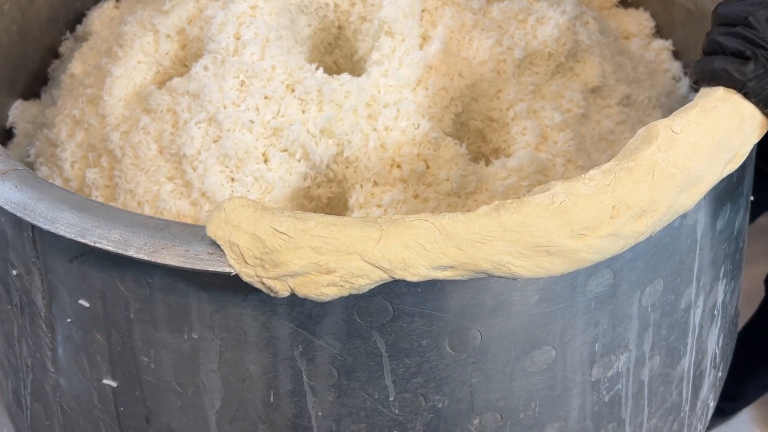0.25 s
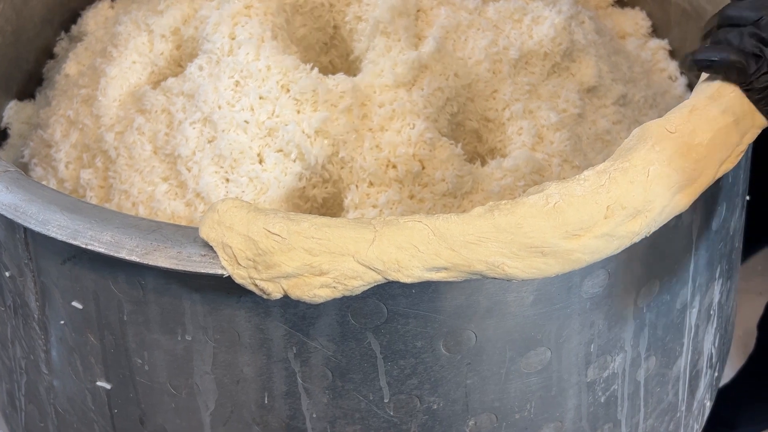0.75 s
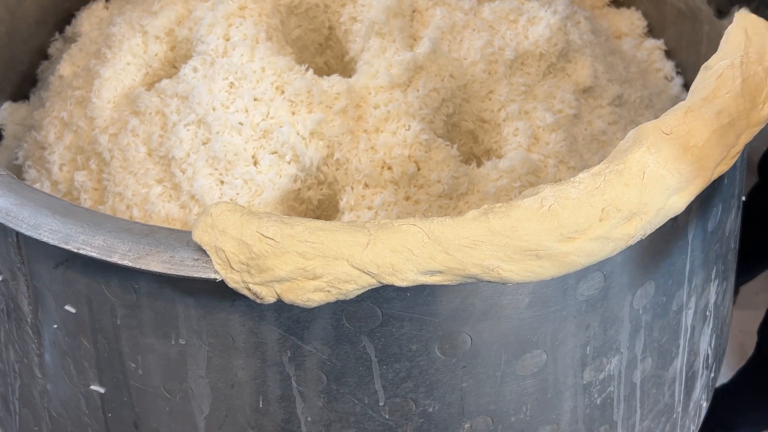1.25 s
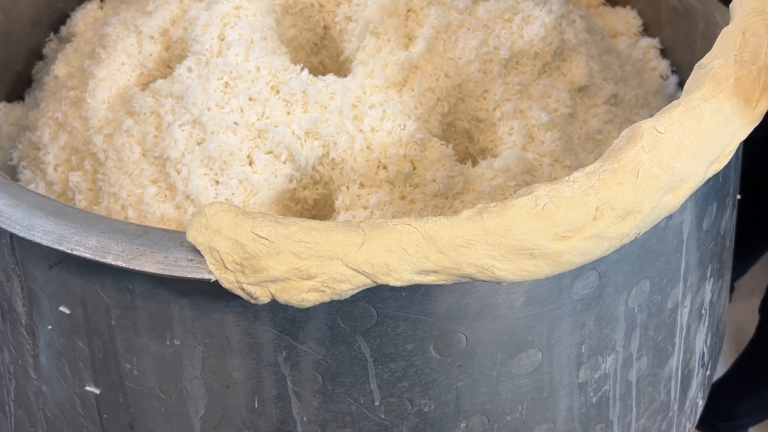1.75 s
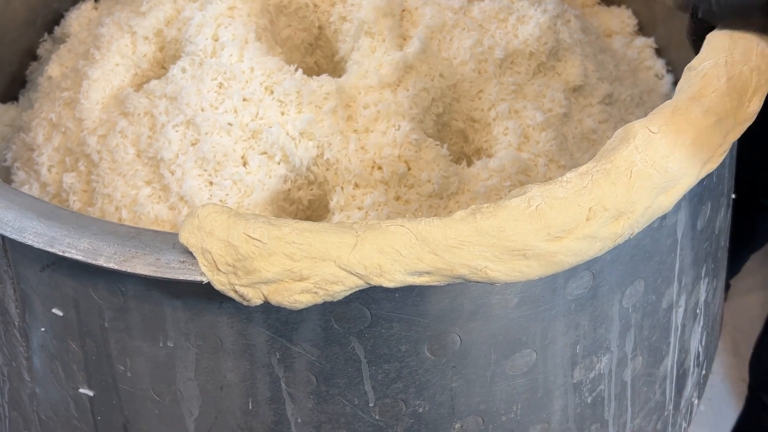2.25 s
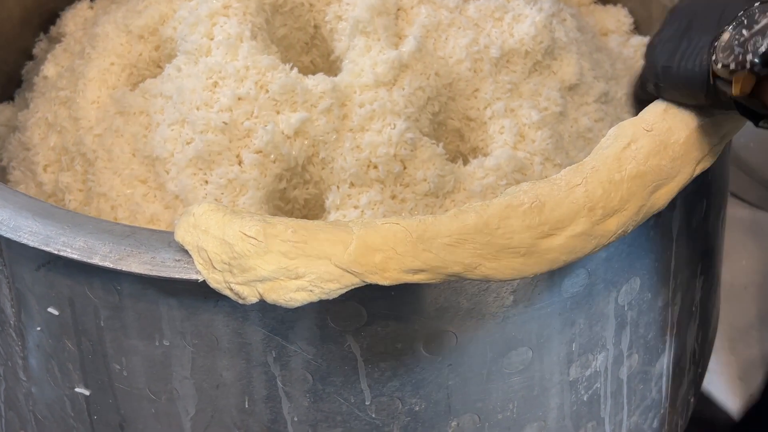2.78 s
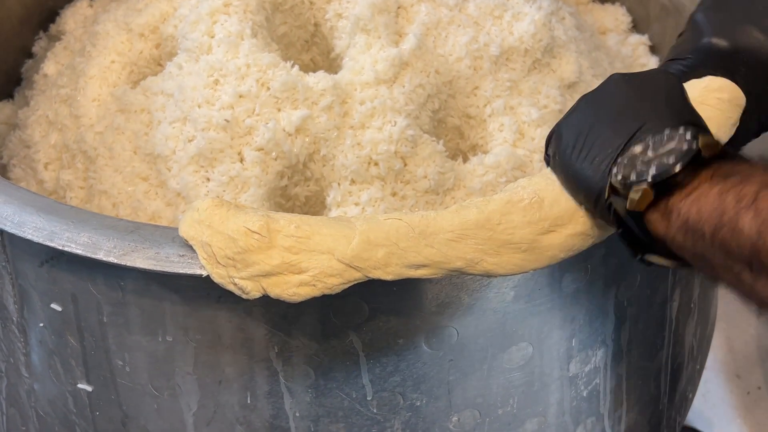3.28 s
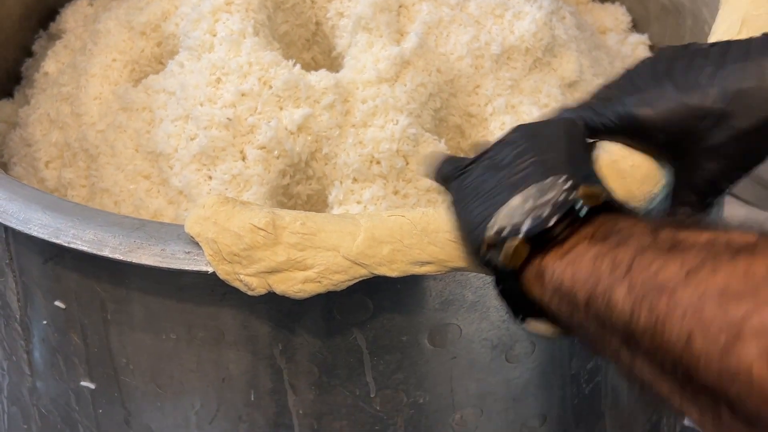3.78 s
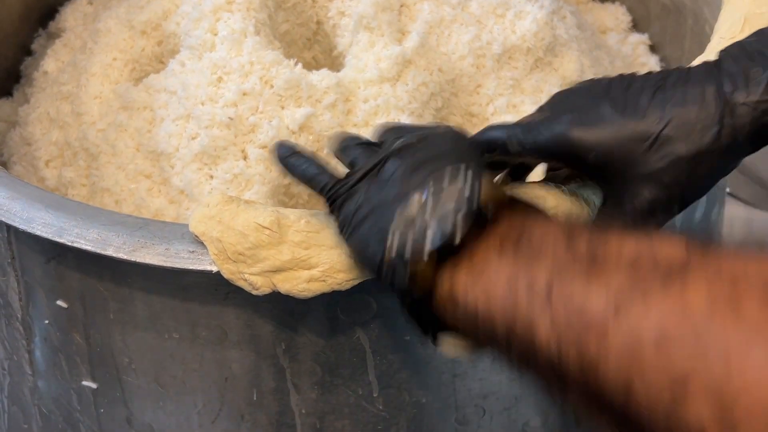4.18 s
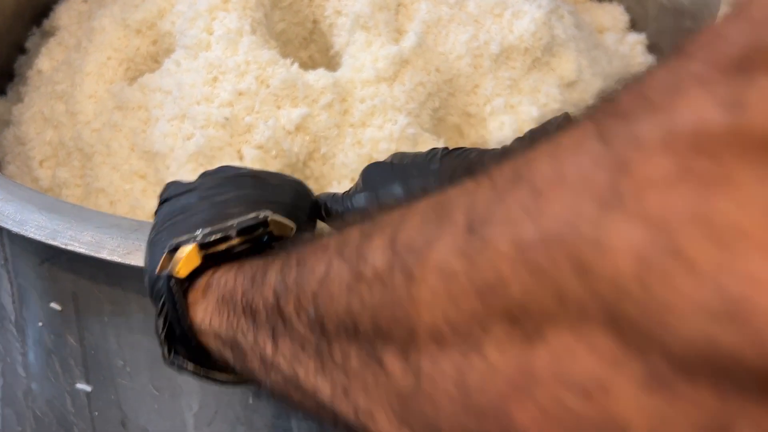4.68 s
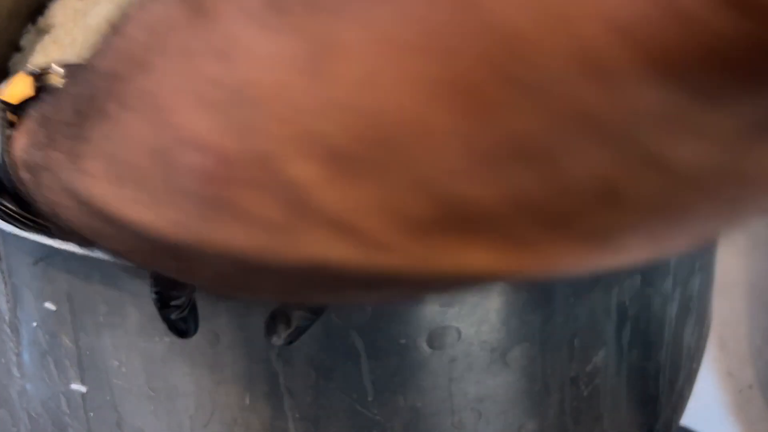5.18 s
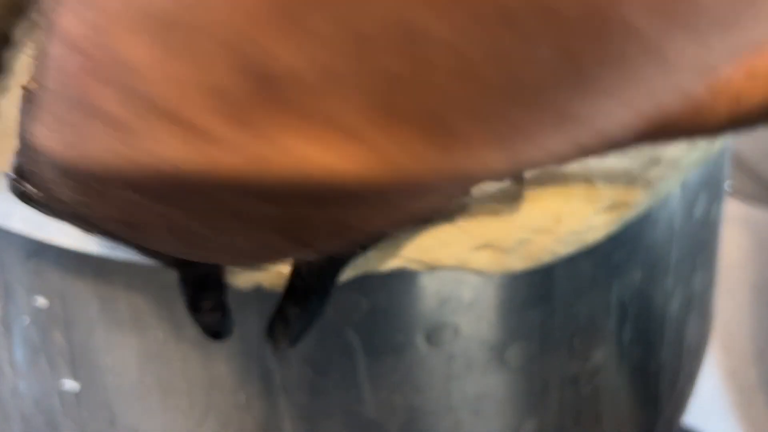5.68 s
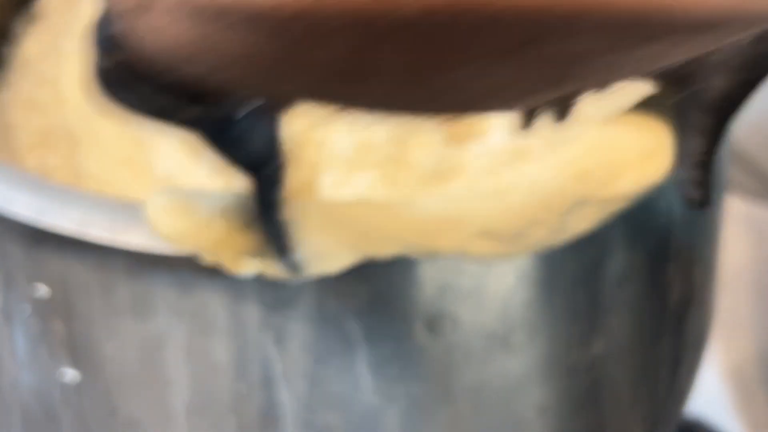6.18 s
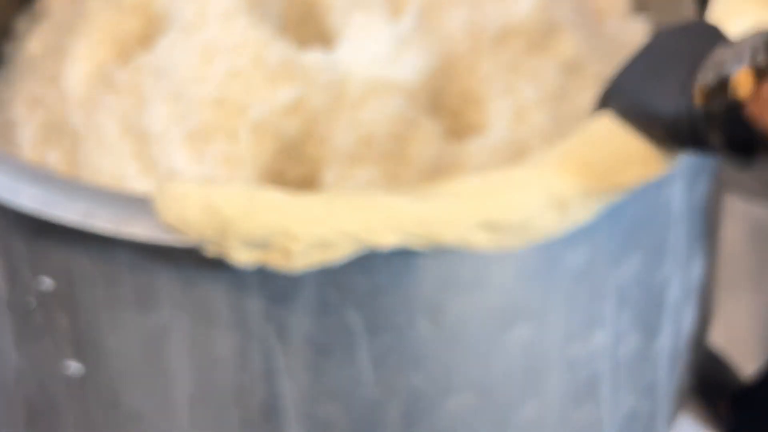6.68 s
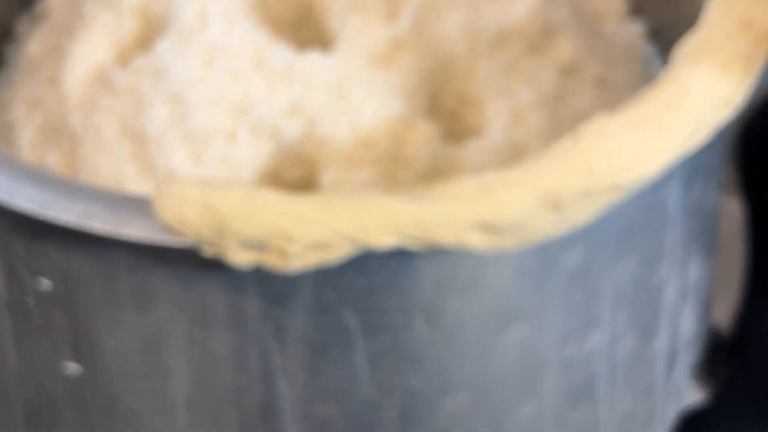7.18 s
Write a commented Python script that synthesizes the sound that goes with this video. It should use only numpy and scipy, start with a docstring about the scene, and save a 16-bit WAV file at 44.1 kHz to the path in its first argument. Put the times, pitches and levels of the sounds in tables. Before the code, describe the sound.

Inside a noisy kitchen, a close stereo microphone catches dark, rushing ventilation with beating motor hum and a deep tone swelling midway. A thin squeaky bearing chirps irregularly on the right. Gloved hands make tiny grainy rustles, then dull taps pressing dough onto a big pot's rim, and finally brighter snaps, one the strongest. At the very end the roar gives way suddenly to higher, broad humming noise.

```python
"""A droning, throbbing rush of kitchen fans and motors, under the rustles and ticks of gloved hands.
The fans are noise coloured by humming ducts; motor tones close in pitch beat into the throb.
A dry bearing flickers and chirps. Gloves rub on a rope of dough (grainy noise bursts), and they
snap and tap as it is pressed onto the rim of a big steamer pot (short rings and cracks).
At the very end everything gives way abruptly to a thinner, higher hum of noise and broad notes."""
import sys
import numpy as np
from scipy import signal
from scipy.fft import rfft, irfft
from scipy.io import wavfile

SR = 44100
rng = np.random.default_rng(int(sys.argv[2]) if len(sys.argv) > 2 else 0)


def inscribe(sig):
    """Save sig as 16-bit PCM at rate SR to the path in sys.argv[1].

    A 1-D sig is mono; a 2-D sig holds one channel per row.
    Samples are clipped to [-1, 1] before scaling.
    """
    pcm = np.round(np.clip(np.atleast_2d(sig).T, -1, 1) * 32767)
    wavfile.write(sys.argv[1], SR, pcm.astype(np.int16))


N = 328104
TIME = np.arange(N) / SR  # seconds
BINS = np.fft.rfftfreq(N, 1 / SR)  # Hz

# Likeness of a diffuse sound at the two microphone ports. Each row: frequency in Hz, likeness 0-1.
PORT_LIKENESS = [(50, .998), (110, .985), (210, .95), (320, .8), (500, .72), (800, .5), (1080, .12),
                 (1500, .35), (3000, .2), (6800, .2), (8300, .88), (12000, .92)]
# Phase between the ports. Each row: frequency in Hz, lead of the left in radians.
PORT_LEAD = [(300, 0), (900, .7), (1400, -1.6), (2100, -1.3), (2600, .9), (7500, 1.2), (8600, -.3),
             (10150, -3.14), (11800, -6.1)]
# Level between the ports. Each row: frequency in Hz, left minus right in dB.
PORT_BALANCE = [(50, -.1), (110, -1.7), (700, -1.9), (1000, -.8), (2200, -1.6), (3500, 0), (6600, 2.8),
                (8500, .4), (11000, .3)]

# Bed of the higher hum at the end. Each row: frequency in Hz, density in dB per Hz.
HIGH_HUM_BED = [(40, -62), (150, -60), (330, -61), (500, -56), (660, -58.5), (850, -65), (1100, -63),
                (1600, -72), (2200, -76), (3400, -78), (4200, -80), (5000, -84), (8000, -90), (15000, -92)]
# Broad notes of the higher hum. Each row: frequency in Hz, width in Hz, rms level in dB.
HIGH_HUM_NOTES = [(515, 70, -36), (1080, 180, -48), (4250, 300, -54)]

# Rush of the fans ahead of the ducts. Each row: frequency in Hz, density in dB per Hz.
FAN_RUSH = [(30, -89), (40, -59), (158, -60.5), (178, -56), (340, -57), (500, -62), (720, -68.5),
            (1020, -74.5), (1600, -75), (2500, -81), (4000, -86.5), (7200, -90.5), (8800, -89),
            (11500, -103), (13200, -115), (16000, -112)]
# Resonances and dips of ducts and room. Each row: frequency in Hz, width in Hz, lift in dB.
DUCT_RESONANCES = [(43.3, 4.3, 4), (99.2, 12.5, 9), (212, 24.6, 4), (256.6, 9.7, 2), (287, 27, -4),
                   (682, 34, 4), (394, 23, -3.5), (890, 33, 4), (2100, 92, 3), (6040, 530, 2.5)]
# Swell of the fans. Each row: time in seconds, roar gain in dB, hiss gain in dB ahead of its flutter.
FAN_SWELL = [(0, 0, 0), (2.4, -.5, 0.5), (3.2, 0, -0.3), (3.8, 1.5, 0), (4.6, 0.4, -0.5), (6.7, 0, 0.4),
             (7.4, 0.5, 0.5)]
# Faint airy whistles of the fan blades. Each row: frequency in Hz, width in Hz, rms level in dB.
BLADE_WHISTLES = [(485.3, 9.1, -48), (503, 16, -51), (690.6, 10, -56), (783.4, 21, -51.5), (1468, 14, -57),
                  (2607, 20, -63), (4850, 29, -66.5), (8056, 53, -71)]

# Tones of the motors; close neighbours beat.
# Each row: frequency in Hz, rms level in dB, unsteadiness as a share of the amplitude.
MOTOR_TONES = [(60.85, -45.5, 0.53), (101.2, -49, 0.35), (108, -49.5, .25), (110.45, -39, 0.17),
               (146.9, -50, 0.64), (173.2, -46, .5), (177.7, -49, 0.64), (199.3, -48, 0.38),
               (220.2, -47.5, .7), (299.6, -49.5, 0.18), (331.6, -51.5, 0.45)]
# The deepest tone swells midway and fades at the end. Each row: time in seconds, rms level in dB.
DEEP_SWELL = [(0, -43), (3.1, -42), (3.5, -41), (4.4, -37), (5.3, -41), (5.7, -40), (7.4, -63)]

# Three close modes of the dry bearing. Each row: frequency in Hz, width in Hz.
BEARING_MODES = [(2040, 40), (2079, 40), (2145, 85)]
# Rubbing in those modes, ahead of the flicker.
# Each row: time in seconds, then the level of the low, middle and high mode in dB.
BEARING_RUB = [(0, -57, -62, -57), (1.2, -54, -57, -59), (2.0, -59, -56, -55.5), (2.7, -63, -68, -54),
               (3.0, -62, -59, -57), (3.7, -65, -67, -58), (4.2, -62, -63, -64), (5.0, -66, -55, -55),
               (5.5, -74, -59, -69), (6.3, -58, -58, -63), (6.7, -57, -60, -59), (7.4, -64, -52, -59)]
# Catches of the bearing, ahead of the placing to the right.
# Each row: middle in seconds, rms level in dB, length in seconds, centre pitch in Hz.
BEARING_CATCHES = [(0.233, -52, 0.08, 2115), (.28, -58, .05, 2050), (0.392, -60, 0.056, 2090),
                   (.72, -56, 0.09, 2140), (1.38, -57, 0.1, 2090), (1.918, -57, .08, 2040),
                   (2.33, -57, .1, 2130), (2.75, -52, 0.055, 2120), (2.82, -53.5, .05, 2050),
                   (3.453, -57, 0.091, 2060), (4.5, -57.5, .12, 2086), (5.775, -53.5, 0.055, 2060),
                   (5.877, -50, .05, 2080), (6.132, -50.5, 0.23, 2085), (6.388, -51, .06, 2070),
                   (6.49, -57, .06, 2080), (6.97, -59, .06, 2075)]

# Gloves rubbing on dough.
# Each row: peak time in seconds, level at the peak in dB, length in seconds, brightness 0-1.
GLOVE_RUBS = [(0.767, -48, 0.033, 0.5), (2.062, -47.5, 0.037, 0.7), (2.393, -44.5, 0.034, 0.8),
              (2.751, -48.5, 0.048, 0.75), (3.063, -48, .04, 0.55), (3.396, -42.5, .025, 0.76),
              (3.432, -46, .025, 0.5), (3.726, -43, 0.031, 0.7), (4.122, -46, 0.047, 0.23),
              (4.445, -51, 0.022, 0.2), (4.833, -48.5, 0.097, 0.27), (5.483, -46, .03, 0.34),
              (5.72, -44.5, 0.031, 0.14), (6.076, -51, 0.054, 0.5)]
# Colour of dull dough. Each row: frequency in Hz, relative level in dB.
DOUGH_COLOUR = [(300, -14), (800, -22), (1500, -28), (2800, 18), (3700, 7.5), (4600, 13.5), (5500, -1),
                (9000, -17), (13000, -37)]
# Colour of rubbing glove film. Each row: frequency in Hz, relative level in dB.
FILM_COLOUR = [(1500, -36), (4000, -2), (6300, 4), (8600, 7), (10200, 3), (11900, -5), (13500, -34),
               (16000, -26)]

# Small snaps of the gloves and taps on the rim.
# Each row: start in seconds, level in dB, share of snap 0-1, dryness of the snap 0-1, tap pitch ratio.
CONTACTS = [(2.7355, -36, .25, .8, 1.03), (3.05, -34, .15, .8, 1.1), (4.1176, -32, .1, .8, 1.05),
            (4.133, -34, 0, .8, 0.92), (4.438, -31, 0.1, .8, 1.02), (4.5901, -31.5, 0.16, .8, 1.03),
            (5.1661, -25.5, 0.02, .8, 1), (5.174, -29, 0, .8, .92), (5.485, -33, 0.04, .8, 1),
            (5.7087, -32, 0, .8, 0.9), (5.7346, -35, .4, .8, 1), (6.062, -37, 1, .8, 1),
            (6.3604, -22.5, 0.7, 0.9, 0.8), (6.701, -15, 0.98, 0.14, 1), (7.016, -27, 0.96, .75, 1),
            (7.344, -34, 1, .3, 1), (7.3475, -32, 1, .3, 1)]
# Ring of the glove film. Each row: frequency in Hz, relative level in dB, t60 in seconds.
FILM_RING = [(5150, -10, 0.006), (6050, -15, 0.006), (8400, 2, 0.0043), (8950, 2, 0.003),
             (11100, -4, 0.0038), (11700, -5.5, .004)]
# Ring of the dough-muffled rim. Each row: base frequency in Hz, relative level in dB, t60 in seconds.
RIM_RING = [(740, 2, 0.018), (1690, 1, .007), (2480, 11.5, 0.0056), (3020, 6, 0.0038), (3430, 13.5, 0.0045),
            (4500, 6, 0.0092)]
# Colour of the dry film crack. Each row: frequency in Hz, relative level in dB.
CRACK_COLOUR = [(2000, -22), (5600, -16), (6400, 1), (9200, -4), (10500, -5), (12000, -15), (14000, -32)]

DEEP_HZ = 48.6  # deepest motor tone
BEARING_WAVER_HZ, CHIRP_EDGE_S = 5, 0.031  # rms pitch waver; fade at each end of a note
SHIFT_S = 7.395  # middle of the turn to the higher hum
EDGE_HZ = 15800  # upper band limit


def amp(db):
    """Decibels to gain."""
    return 10 ** (np.asarray(db) / 20)


def unit(x):
    """Scales to an rms of one."""
    return x / np.sqrt(np.mean(abs(x) ** 2) + 1e-20)


def read(points, hz):
    """Joins (Hz, value) points by straight lines on a log-frequency axis."""
    f, value = np.transpose(points)
    return np.interp(np.log(hz + 1), np.log(f + 1), value)


def follow(rows, axis=1):
    """Reads one column of a time curve at every sample."""
    rows = np.asarray(rows)
    return np.interp(TIME, rows[:, 0], rows[:, axis])


def wander(rate_hz, size=2 ** 13):
    """Slow random drift of rms one, its changes rolled off smoothly around the given rate."""
    coarse = np.linspace(0, N / SR, size)
    smooth = np.exp(-.5 * (np.fft.rfftfreq(size, coarse[1]) / rate_hz) ** 2)
    drift = irfft(rfft(rng.standard_normal(size)) * smooth)
    return np.interp(TIME, coarse, unit(drift))


def pair(left, right):
    """Turns two spectra into port signals, with the phase and level offsets between the ports."""
    tilt = amp(read(PORT_BALANCE, BINS) / 2)
    lag = np.exp(-1j * read(PORT_LEAD, BINS))
    return irfft(np.array([left * tilt, right * lag / tilt]), N)


def ports(a, b):
    """Mixes two unrelated spectra into a diffuse sound, partly alike at the two ports."""
    same = np.clip(read(PORT_LIKENESS, BINS), 0, 1)
    return pair(a, same * a + np.sqrt(1 - same ** 2) * b)


def air(density_db):
    """Turbulent noise with the given level per Hz, ahead of the balance between the ports."""
    noise = rfft(rng.standard_normal((2, N)))
    return ports(*(noise * amp(density_db) * np.sqrt(SR / 2)))


def whistle(hz, width_hz):
    """Noise in one narrow resonance, rms one."""
    return unit(air(-20 * np.log10(1 + (2 * (BINS - hz) / width_hz) ** 2)))


def high_hum():
    """A thinner rush of noise with a few broad, higher notes."""
    notes = sum(amp(db) * whistle(hz, width) for hz, width, db in HIGH_HUM_NOTES)
    return air(read(HIGH_HUM_BED, BINS)) + notes


def fans(split_hz=850, flutter_db=0.97):
    """Rushing air coloured by the ducts; the roar swells gently and the hiss flutters."""
    colour = read(FAN_RUSH, BINS)
    for hz, width, db in DUCT_RESONANCES:
        colour = colour + db * 2 ** -((2 * (BINS - hz) / width) ** 2)
    rush = air(colour)
    roar = irfft(rfft(rush) / (1 + (BINS / split_hz) ** 4), N)
    hiss = rush - roar
    hiss_db = follow(FAN_SWELL, axis=2) + flutter_db * wander(14.0)
    return roar * amp(follow(FAN_SWELL, axis=1)) + hiss * amp(hiss_db)


def blades():
    """Air passing the fan blades whistles faintly, as noise in narrow resonances."""
    return sum(amp(db) * whistle(hz, width) for hz, width, db in BLADE_WHISTLES)


def tone(hz, unsteady, waver_hz):
    """A tone of rms one that wavers in level and phase, separately for each of two spectra."""
    sway = np.array([unit(1 + unsteady * (wander(waver_hz) + 1j * wander(waver_hz))) for _ in range(2)])
    turns = hz * TIME + rng.random((2, 1))
    return unit(ports(*rfft((sway * np.exp(2j * np.pi * turns)).real)))


def motors(waver_hz=0.3, deep_unsteady=0.072):
    """Slowly wavering motor tones that beat with each other, over one deep tone that swells."""
    hum = sum(amp(db) * tone(hz, unsteady, waver_hz) for hz, db, unsteady in MOTOR_TONES)
    deep = amp(follow(DEEP_SWELL)) * tone(DEEP_HZ, deep_unsteady, waver_hz)
    return hum + deep


def bearing(side_db=7.0, flicker_db=4.0, shake_db=2.5):
    """Dry rubbing keeps three modes flickering; each catch sings a wavering note, placed to the right."""
    rub = np.zeros((2, N))
    for column, (hz, width) in enumerate(BEARING_MODES, start=1):
        rub += amp(follow(BEARING_RUB, axis=column)) * whistle(hz, width)
    rub *= unit(amp(flicker_db * wander(24)))
    drift = np.cumsum(BEARING_WAVER_HZ * wander(22.0)) / SR  # in turns
    notes = np.zeros(N)
    for s, db, length, hz in BEARING_CATCHES:
        grip = np.clip(.5 + (length / 2 - abs(TIME - s)) / CHIRP_EDGE_S, 0, 1)
        notes += amp(db) * grip * np.sqrt(2) * np.sin(2 * np.pi * (hz * TIME + drift))
    sing = rfft(notes * unit(amp(shake_db * wander(30))))
    return rub + pair(sing, sing) * amp([[-side_db], [side_db]])  # left down, right up


def contact(force, colour):
    """Random tiny slips under a force envelope, coloured by the touching surfaces."""
    slips = rfft(force * rng.standard_normal((2, N)))
    return ports(*(slips * unit(amp(read(colour, BINS)))))


def gloves(grain_db=4, grain_hz=160):
    """Short grainy rubs, each a blend of dull dough and bright glove film."""
    power = np.zeros((2, N))
    for s, db, length, bright in GLOVE_RUBS:
        stroke = amp(db) * np.exp(-2 * ((TIME - s) / length) ** 2)
        power += np.outer(np.clip([1 - bright, bright], 0, 1), stroke ** 2)
    dough, film = np.sqrt(power) * unit(amp(grain_db * wander(grain_hz)))
    return contact(dough, DOUGH_COLOUR) + contact(film, FILM_COLOUR)


def ring(modes, pitch, rise_s, size=1024):
    """Dying modes with a soft start, all scaled by one pitch ratio; peak one."""
    t = np.arange(size) / SR
    sound = np.zeros(size)
    for hz, db, t60 in modes:
        decay = np.exp(-np.log(1000) * t / t60)
        sound += amp(db) * decay * np.sin(2 * np.pi * (hz * pitch * t + rng.random()))
    sound *= 1 - np.exp(-(t / rise_s) ** 2)
    return sound / abs(sound).max()


def crack(peak_s=0.0011, width_s=0.00058, size=1024):
    """A toneless burst of tiny slips in the glove film; peak one."""
    envelope = np.exp(-((np.arange(size) / SR - peak_s) / width_s) ** 2)
    burst = rng.standard_normal(size) * envelope
    sound = irfft(rfft(burst) * amp(read(CRACK_COLOUR, np.fft.rfftfreq(size, 1 / SR))))
    return sound / abs(sound).max()


def ticks(snap_rise_s=0.00071, tap_rise_s=0.00064, room_db=-16, room_t60=.25):
    """Contacts blend a snap of film (ring or dry crack) with a rim tap; the kitchen adds a faint tail."""
    sound = np.zeros(N)
    for s, db, bright, dryness, pitch in CONTACTS:
        share, dry = np.clip([bright, dryness], 0, 1)
        snap = np.sqrt(dry) * crack() + np.sqrt(1 - dry) * ring(FILM_RING, 1, snap_rise_s)
        tap = ring(RIM_RING, pitch, tap_rise_s)
        blow = np.sqrt(share) * snap + np.sqrt(1 - share) * tap
        part = sound[round(s * SR):][:len(blow)]  # a view: adding here adds to sound
        part += amp(db) * blow[:len(part)]
    tail = rng.standard_normal((2, N)) * np.exp(-np.log(1000) * TIME / room_t60)
    tail /= np.linalg.norm(tail[0])
    direct = rfft(sound)
    return pair(direct, direct) + amp(room_db) * ports(*(direct * rfft(tail)))


def scene(fade_s=0.0061):
    """The kitchen drone and the hands, then the sudden higher hum."""
    kitchen = fans() + blades() + motors() + bearing() + gloves() + ticks()
    shift = np.clip(.5 + (TIME - SHIFT_S) / fade_s, 0, 1)
    return (1 - shift) * kitchen + shift * high_hum()


def record(dry):
    """A steep low-pass filter sets the upper band limit of both ports."""
    lowpass = signal.firwin(511, EDGE_HZ, window=("kaiser", 9), fs=SR)
    return signal.oaconvolve(dry, lowpass[None], "same")


dry = scene()
out = record(dry)
inscribe(out)
```